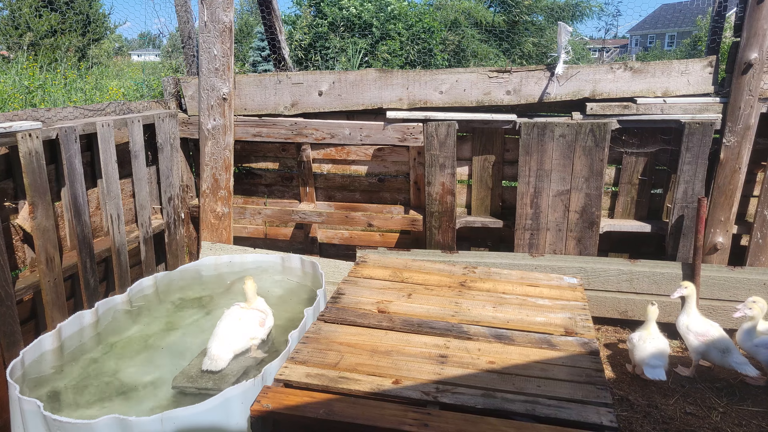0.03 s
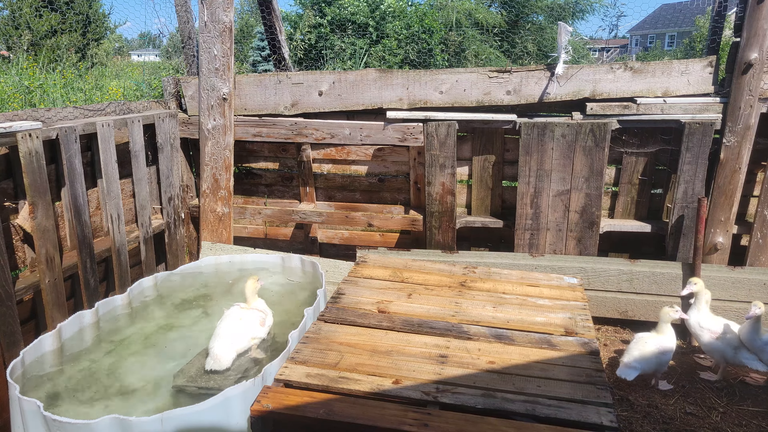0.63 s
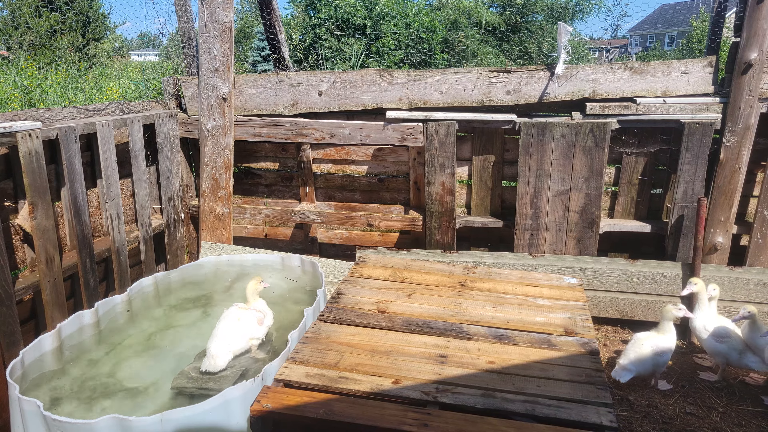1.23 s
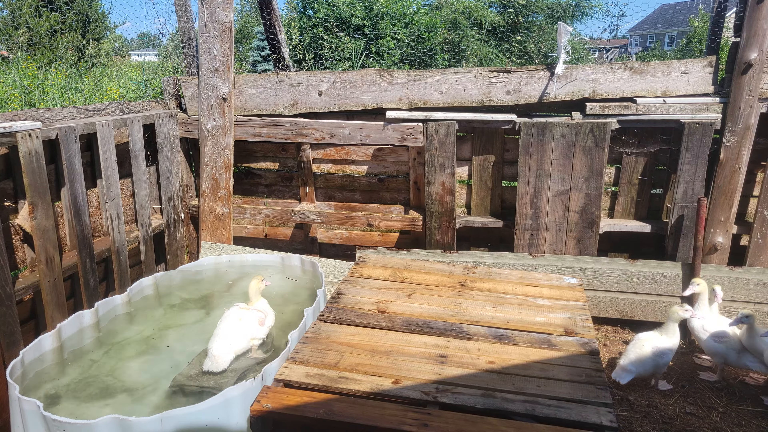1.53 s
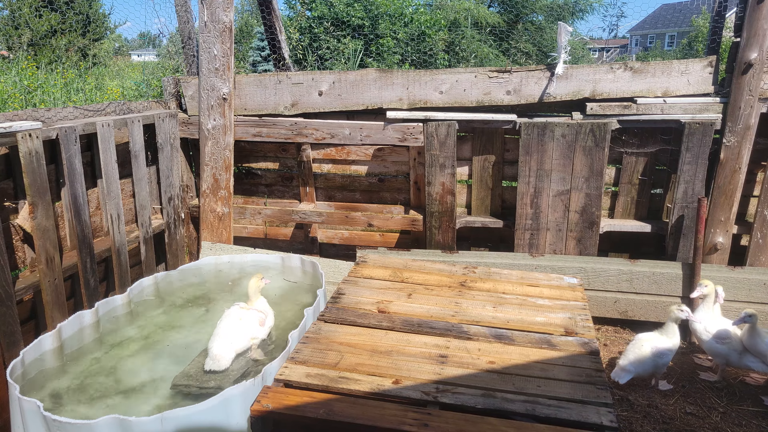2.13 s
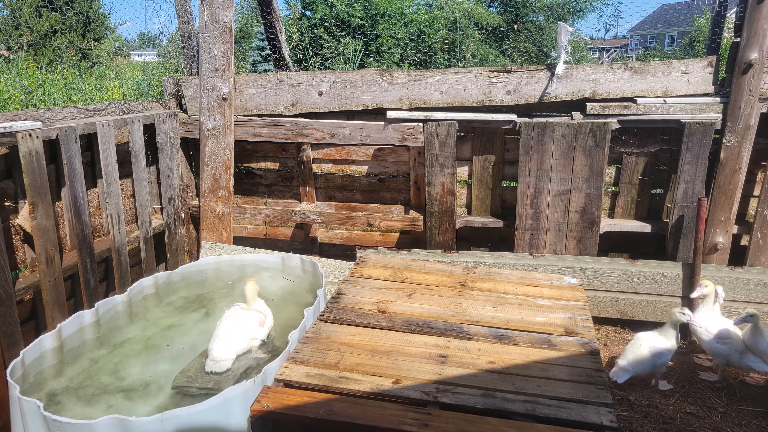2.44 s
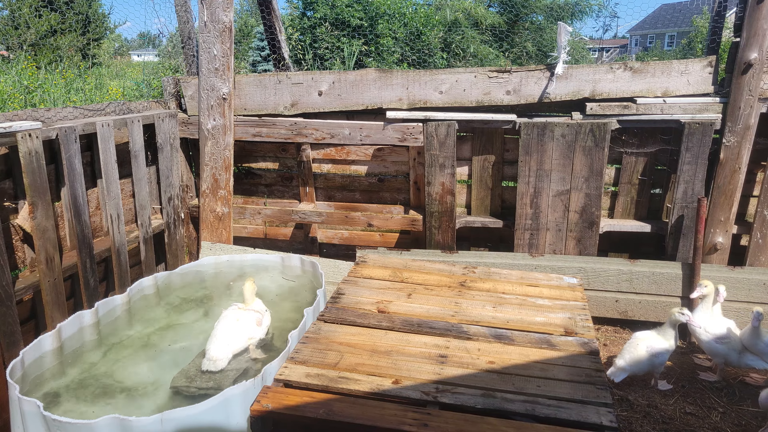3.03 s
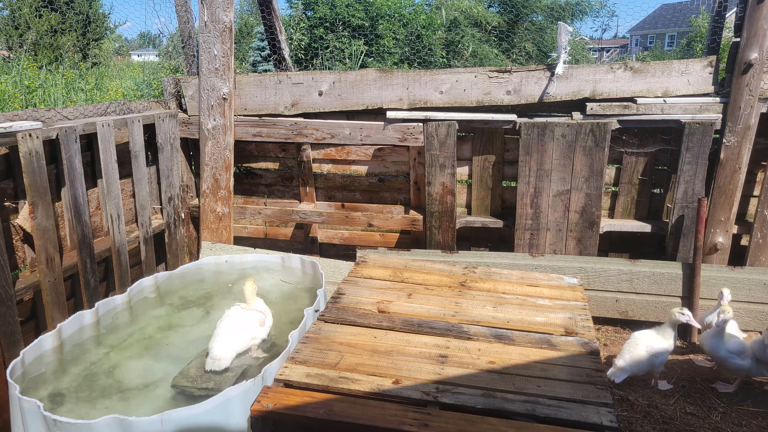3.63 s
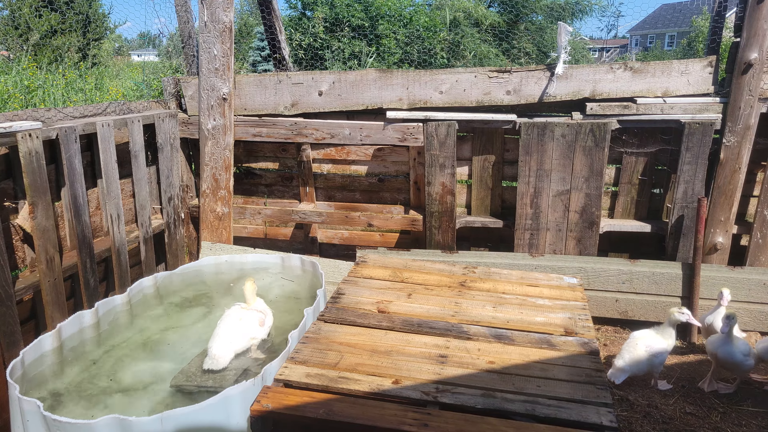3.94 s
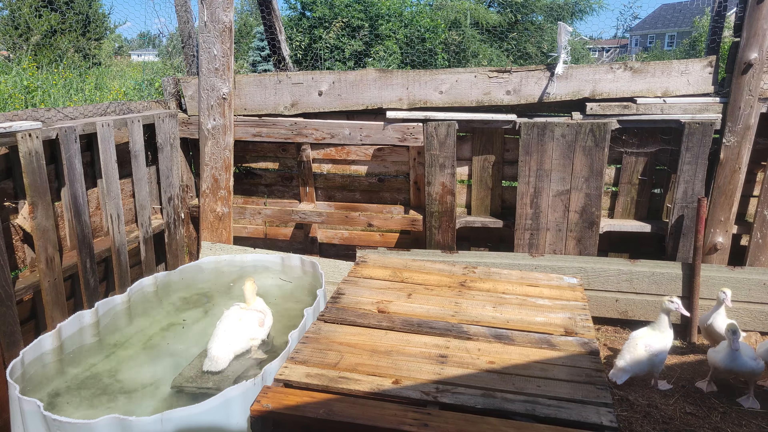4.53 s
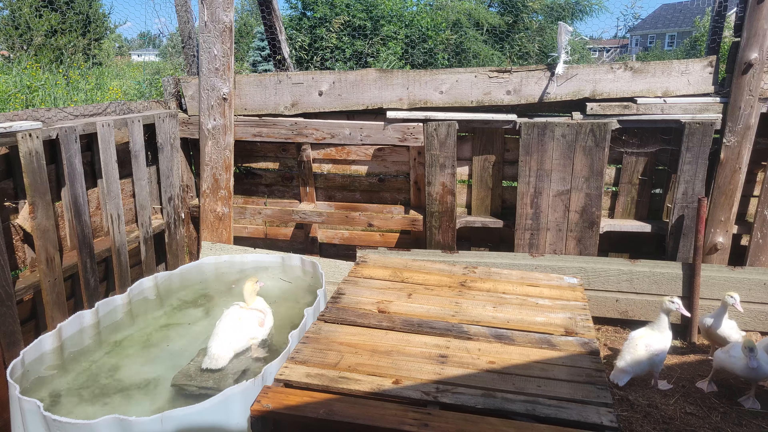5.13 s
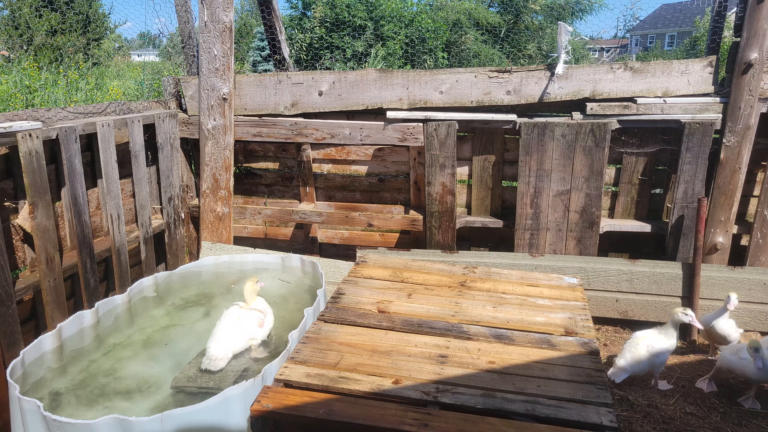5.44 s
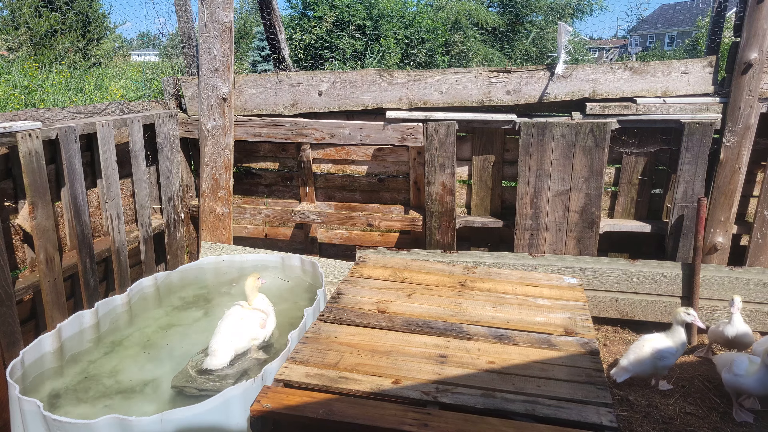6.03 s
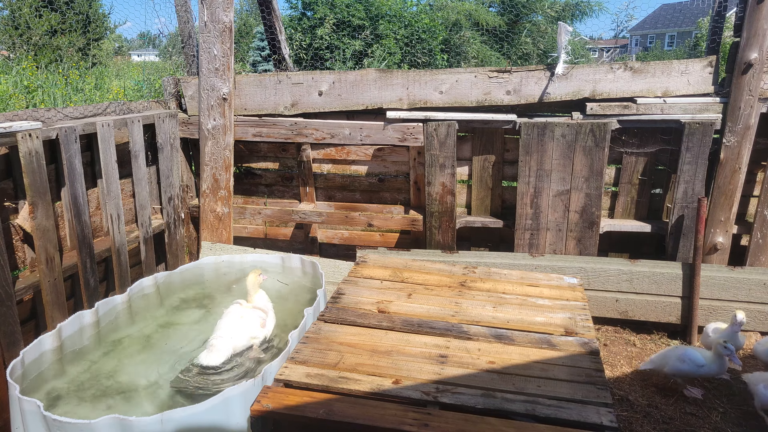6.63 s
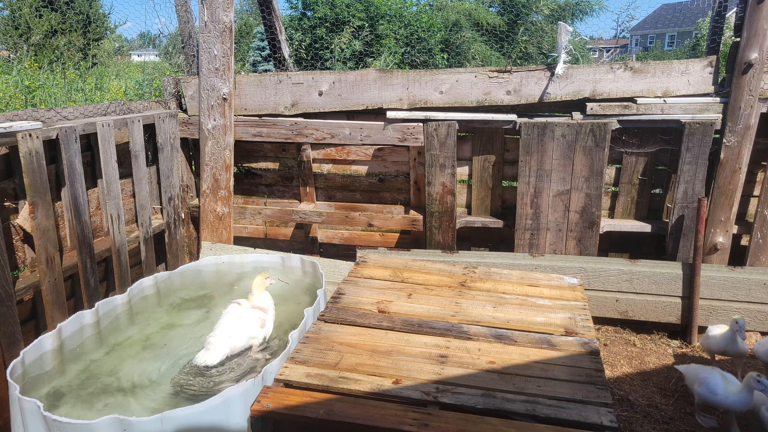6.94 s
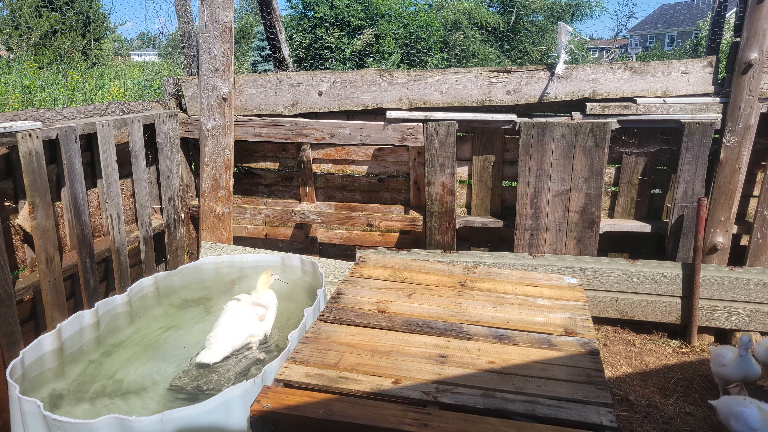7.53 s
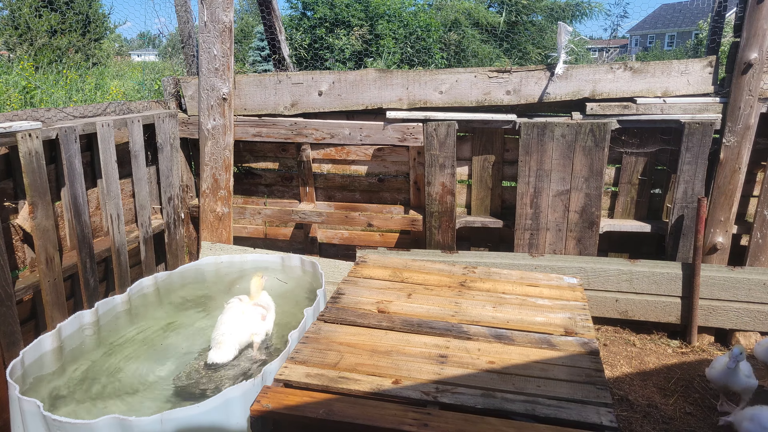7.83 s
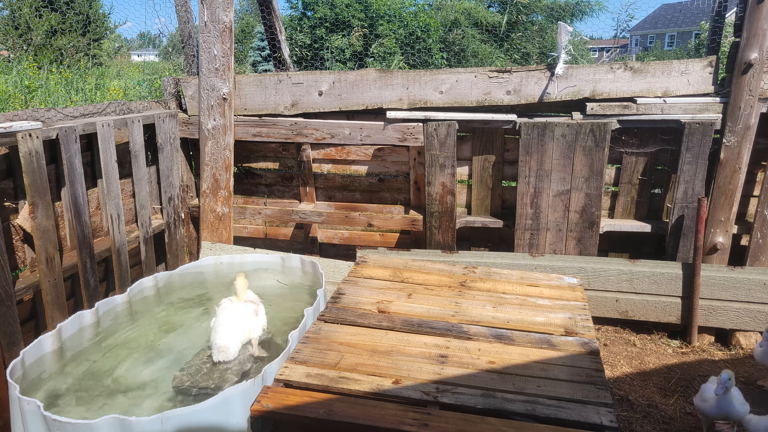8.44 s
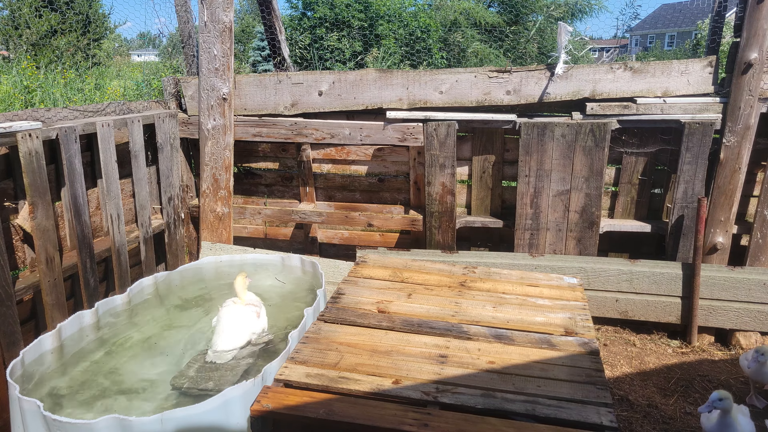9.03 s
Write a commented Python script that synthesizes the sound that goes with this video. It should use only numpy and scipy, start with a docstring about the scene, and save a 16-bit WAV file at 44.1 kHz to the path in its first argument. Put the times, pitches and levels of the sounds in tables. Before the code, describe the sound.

A quiet backyard pen, with soft steady outdoor air and a breeze rumbling on the microphone in short gusts throughout. From the start, ducklings slightly to the right slap, scuff and thump their wet feet and wings on wooden boards and soil, over a faint rustle of feathers and tiny gritty ticks. The loudest slap and knock comes at about 2 seconds, followed by a busy patter until 3 and scattered hits around 4 to 5, fading by 6. Thin, husky peeps and chirps begin near 0.7 seconds, are strongest from 1 to 2.5, then continue faintly, with warbling trills near 6.8 and 8.8. From about 6 seconds a duck paddles softly in a tub on the left, and from 7 to 9 it flicks small drops that plink into the water. The fence gives everything a short echo.

```python
"""Ducklings in a backyard pen

Off to the right, wet feet and wings slap, scuff and thump on wooden pallets and soil while the
ducklings peep in thin, husky whistles. Later the duck in the tub on the left paddles and flicks a few
drops, each leaving a tiny ringing bubble. The fence throws back a short echo, and a breeze rumbles on
the microphone's two openings (its ports) over a quiet garden."""
import sys
import numpy as np
from scipy import signal
from scipy.fft import rfft, irfft
from scipy.io import wavfile
from scipy.ndimage import uniform_filter1d

SR = 44100
rng = np.random.default_rng(int(sys.argv[2]) if len(sys.argv) > 2 else 0)


def master_out(mix):
    """Clip the mix to full scale and print it as 16-bit PCM to the path in sys.argv[1]."""
    frames = np.transpose(np.atleast_2d(mix))
    ceiling = np.clip(frames, -1, 1)
    pcm = np.round(ceiling * 32767).astype(np.int16)
    wavfile.write(sys.argv[1], SR, pcm)


N = 409688
TIME = np.arange(N) / SR
FREQS = np.fft.rfftfreq(N, 1 / SR)
SIDES = np.array([[1], [-1]])  # plus for the left channel, minus for the right
BRUSH_LEAD_S = .02  # a slap's sound starts this long before the hit

# How the two ports colour sound from all around differently: f/Hz, left minus right/dB
PORT_BALANCE = [(130, -5.5), (400, -2), (2400, -1.5), (4500, -7.5), (8500, 4.5), (11000, 10), (15500, 5)]


def slap(length, db, spray_db, hollow_db=2, brush_db=-21, fizz_db=-7.5):
    """A foot brushes the ground, then squeezes out a crackle of water and grit."""
    # Notes of the hollow under a webbed foot: f/Hz, width/Hz, level/dB
    hollow = [(1846, 68, 1), (2190, 23, -35), (2334, 86, -15), (2600, 69, -32), (3294, 220, 7),
              (3800, 96, 1)]
    t = np.arange(SR // 5) / SR - BRUSH_LEAD_S
    since_hit = np.maximum(t, 0)
    brush = undb(brush_db) * np.exp(-abs(t) / 0.0031)
    shape = swell_and_fade(since_hit, 0.21 * length, 0.34 * length) + brush
    crackle = grains(len(t), rate=11000, spread_db=2) * shape
    cupped = sum(undb(level + hollow_db) * ring(crackle, hz, width) for hz, width, level in hollow)
    smack = band(crackle + cupped, 640, 3020, order=3)
    spray = band(crackle, 3660, 6930, order=4)
    fine = crackle * np.exp(-since_hit / (5.9 * length))  # the finest spray is over first
    fizz = band(fine, 8600, 24000, order=3) + 0.27 * band(fine, 4300, 11900)
    return (burst(smack, length, db) + burst(spray, length, db + spray_db)
            + burst(fizz, length, db + spray_db + fizz_db))


def slaps(spatter_delay_s=0.025, spatter_length_s=0.035, spatter_db=-21):
    """Each wet slap is followed by a weaker spatter as the water lands again."""
    # Slaps and scuffs: t/s, length/s, level/dB, spray compared with that level/dB
    hits = [(.176, 0.013, -57.5, -1), (0.299, 0.033, -66.5, 5.5), (0.685, 0.0094, -50.5, -7),
            (0.764, 0.012, -53, -4.5), (1.448, 0.011, -36.5, 1.5), (1.701, 0.0094, -38.5, -2),
            (2.016, .008, -45, -12), (2.046, 0.0047, -24, -5), (2.074, 0.019, -47, 1.5),
            (2.241, 0.016, -49.5, -5), (2.345, 0.043, -58, 2), (2.465, 0.009, -39, -8.5),
            (2.568, 0.0096, -38, -2), (2.617, 0.022, -33.5, -1.5), (2.646, .012, -46.5, 9),
            (2.715, 0.013, -47.5, 3), (2.822, 0.019, -53, -3), (2.889, 0.014, -45, 7.5),
            (2.948, 0.041, -55, -4), (3.006, 0.013, -45, -1), (3.157, 0.01, -40.5, 1.5),
            (3.46, 0.027, -58, -11), (3.617, 0.011, -41, -1), (4.007, 0.006, -45, 5),
            (4.012, 0.0089, -29.5, -10), (4.192, 0.0091, -38, -11.5), (4.834, 0.012, -39.5, 0),
            (4.935, 0.0051, -44, -20), (5.579, 0.012, -55, 2.5), (5.663, 0.033, -54, -5.5),
            (5.791, 0.017, -64, 1), (6.09, .017, -67.5, 7), (6.599, 0.015, -63.5, 2),
            (8.608, 0.0085, -67, 8.5), (8.648, .06, -75, 7)]
    out = np.zeros(N)
    for s, length, db, spray_db in hits:
        start = s - BRUSH_LEAD_S
        add(out, start, slap(length, db, spray_db))
        add(out, start + spatter_delay_s, slap(spatter_length_s, db + spatter_db, spray_db))
    return out


def thumps(max_sag=0.68, soft_db=26, thud_db=-6):
    """A landing makes a short low note, and its rough push sets the boards ringing."""
    # Landings, several in a row for a heavy one: t/s, length/s, f/Hz, thump/dB, board knock/dB
    landings = [(.03, 0.025, 142, -46.5, -57), (0.419, 0.034, 145, -47, -64),
                (0.727, 0.0066, 300, -44.5, -51), (1.196, 0.0086, 280, -44.5, -51),
                (1.206, 0.043, 230, -42, -74), (1.313, 0.013, 245, -39.5, -53.5),
                (1.33, 0.039, 242, -40.5, -69), (1.453, 0.023, 308, -30.5, -40.5),
                (1.511, 0.022, 297, -43, -51.5), (1.704, 0.017, 158, -45.5, -43),
                (1.726, 0.031, 322, -48.5, -43), (1.935, 0.033, 201, -53, -47.5),
                (2.04, 0.01, 376, -27, -25), (2.046, 0.016, 561, -26.5, -29.5),
                (2.048, 0.014, 692, -22, -36), (2.055, 0.01, 364, -26.5, -38), (2.065, 0.02, 414, -43, -41),
                (2.238, 0.012, 280, -42.5, -44), (2.256, 0.031, 224, -39, -64),
                (2.468, 0.026, 206, -44, -43.5), (2.565, .036, 260, -45, -36.5),
                (2.612, 0.031, 238, -44, -31.5), (2.627, 0.023, 337, -35.5, -39),
                (2.741, 0.027, 230, -47, -47), (2.777, 0.016, 323, -27, -40.5),
                (2.79, 0.048, 168, -43.5, -58), (2.883, 0.036, 365, -55, -37.5),
                (2.947, 0.05, 396, -54, -46.5), (3.062, 0.03, 377, -69, -47.5),
                (3.148, 0.022, 265, -44, -40), (3.155, 0.05, 156, -47, -55), (3.45, 0.02, 497, -49.5, -48),
                (3.617, 0.049, 214, -56.5, -52.5), (4.019, 0.014, 321, -33, -35),
                (4.195, 0.037, 385, -53.5, -50), (4.26, 0.077, 283, -47.5, -52),
                (4.303, 0.011, 288, -32, -46.5), (4.5, 0.017, 129, -55, -82), (4.595, 0.029, 148, -68, -69),
                (4.797, 0.0057, 263, -32, -45.5), (4.804, 0.018, 442, -40.5, -53),
                (4.84, 0.021, 260, -48, -44), (4.937, 0.014, 320, -38.5, -35),
                (5.586, 0.0062, 272, -42, -51), (5.666, .021, 303, -60, -55.5),
                (5.794, 0.011, 269, -52.5, -56)]
    # Notes the boards ring with: f/Hz, width/Hz, level/dB
    boards = [(502, 240, 3), (549, 17, -0.5), (701, 70, 3), (872, 113, 2.5), (940, 1300, -7)]
    out, t = np.zeros(N), np.arange(SR // 5) / SR
    for s, length, hz, thump_db, knock_db in landings:
        softness = np.clip((thump_db - knock_db) / soft_db, 0, 1)  # soft landings sag more in pitch
        pitch = hz * (1 - max_sag * softness ** 2 * np.tanh(t / (2.96 * length)))
        shape = swell_and_fade(t, 0.14 * length, 0.57 * length)
        note = np.sin(2 * np.pi * np.cumsum(pitch) / SR) * shape
        thud = band(rng.standard_normal(len(t)) * shape, 120, 325)
        thump = unit(note) + undb(thud_db) * unit(thud)
        push = rng.standard_normal(len(t)) * swell_and_fade(t, 0.11 * length, 0.59 * length)
        knock = sum(undb(db) * ring(push, f, width) for f, width, db in boards)
        add(out, s, burst(thump, length, thump_db) + burst(band(knock, 350, 1860), length, knock_db))
    return out


def voice(hz, hoarse):
    """A whistle with weak overtones; a hoarse throat shakes its pitch and strength and adds hiss."""
    hoarse = np.clip(hoarse, 0, 1)
    shake = (.012 + .11 * hoarse ** 3) * wander(900, len(hz))
    flutter = (.15 + .8 * hoarse) * wander(600, len(hz))
    phase = 2 * np.pi * np.cumsum(hz * (1 + shake)) / SR
    tone = np.sin(phase) + undb(-14) * np.sin(2 * phase) + undb(-25) * np.sin(3 * phase)
    hiss = band(rng.standard_normal(len(hz)), .75 * np.mean(hz), 2.2 * np.mean(hz), order=3)
    return unit(unit(tone * (1 + flutter)) + hoarse * undb(-4) * unit(hiss))


def call(length, hz, rise_oct, arch_oct, db, hoarse, warble_oct=0, warble_hz=21, fade=0.16):
    """One call: the pitch glides along an arch, perhaps warbling, while the voice fades a little."""
    progress = np.linspace(0, 1, int(length * SR))
    glide = rise_oct * (progress - .5) - arch_oct * (2 * progress - 1) ** 2
    warble = warble_oct * progress * np.sin(2 * np.pi * warble_hz * length * progress)
    shape = signal.windows.tukey(len(progress), .25) * np.exp(-fade * progress)
    return burst(voice(hz * 2 ** (glide - warble), hoarse) * shape, length, db)


def ducklings(peep_fall_oct=0.35, peep_arch_oct=0.057, peep_hoarse=.33, faint_from_s=6.8):
    """Falling peeps, arched chirps and two trills, with four faint peeps from the rest of the flock."""
    # Short falling peeps: t/s, length/s, f/Hz, level/dB
    peeps = [(1.557, 0.063, 1890, -42), (2.318, 0.025, 1640, -43.5), (2.435, 0.03, 1718, -38.5),
             (3.471, 0.058, 1980, -65), (3.577, .037, 2610, -59), (4.407, 0.03, 2520, -67),
             (4.518, 0.028, 2980, -84), (4.594, 0.067, 2610, -64), (4.71, 0.05, 2620, -64.5),
             (5.053, 0.031, 2220, -61), (5.408, 0.046, 2870, -64.5), (5.696, 0.03, 2400, -64),
             (5.842, 0.037, 2450, -67), (6.157, .045, 2530, -67), (6.211, 0.039, 2060, -64),
             (6.292, .065, 2250, -64), (6.469, 0.032, 2100, -64.5), (6.702, 0.041, 2300, -63.5),
             (7.048, 0.05, 2480, -68), (7.389, 0.029, 2210, -64.5), (7.597, 0.095, 2310, -71),
             (7.757, 0.067, 2780, -62.5), (7.84, 0.078, 2100, -64), (8.07, .06, 2930, -73),
             (8.374, 0.029, 3060, -71)]
    # Chirps: t/s, length/s, middle f/Hz, rise/octaves, level/dB, hoarseness (0 clear, 1 rasping)
    chirps = [(0.706, 0.07, 2320, 0.42, -53, .35), (0.892, 0.25, 2210, -0.042, -64, .95),
              (1.005, 0.023, 1400, -.1, -47, 0.77), (1.251, 0.046, 1887, -0.023, -45.5, 0.13),
              (1.349, 0.019, 1706, -0.11, -42.5, 0.14), (1.629, 0.07, 2064, -0.2, -43, 0.88),
              (1.635, 0.057, 2780, -.07, -51.5, 0.4), (1.782, 0.056, 2418, -0.19, -48, 0.57),
              (1.933, .03, 2386, 0.053, -45, 1.13), (3.301, .084, 1830, .33, -55.5, 0.16),
              (6.754, 0.059, 1764, -0.15, -64.5, 0.21), (8.486, 0.049, 1860, -.07, -59, 0.3),
              (8.667, 0.045, 2450, -0.11, -57.5, 0.35), (8.8, .035, 1620, 0.17, -61.5, 0.59),
              (9.075, 0.1, 2690, -0.63, -65, 0.26), (9.101, 0.092, 1660, 0.044, -59.5, 0.4)]
    # Husky trills that climb as they warble: t/s, length/s, middle f/Hz, rise/octaves, level/dB
    trills = [(6.767, .198, 2185, 0.093, -60.5), (8.819, .245, 1978, 0.39, -58.5)]
    out = np.zeros(N)
    for s, length, hz, db in peeps:
        hoarse = peep_hoarse + .005 * (db + 63)  # more effort makes a hoarser peep
        add(out, s, call(length, hz, -peep_fall_oct, peep_arch_oct, db, hoarse))
    for s, length, hz, rise_oct, db, hoarse in chirps:
        add(out, s, call(length, hz, rise_oct, arch_oct=.21, db=db, hoarse=hoarse))
    for s, length, hz, rise_oct, db in trills:
        trill = call(length, hz, rise_oct, arch_oct=0, db=db, hoarse=.54, warble_oct=.26, fade=0.099)
        add(out, s, trill)
    for when, pitch in rng.random((4, 2)):
        hz = 2850 * 2 ** (.4 * (pitch - .5))
        faint_peep = call(0.023, hz, -peep_fall_oct, peep_arch_oct, db=-68, hoarse=peep_hoarse)
        add(out, faint_from_s + when * (TIME[-1] - faint_from_s), faint_peep)
    return out


def drop(hz, db, glide_per_s=8):
    """A drop ticks on the water and leaves a tiny bubble that rises in pitch."""
    t = np.arange(SR // 20) / SR
    bubble = np.sin(2 * np.pi * hz * t * (1 + glide_per_s * t / 2)) * swell_and_fade(t, 0.0013, 0.0036)
    crackle = grains(len(t), rate=6000, spread_db=1.4) * swell_and_fade(t, 0.0012, 0.0033)
    splash = band(crackle, 2700, 6300, order=4)
    return burst(unit(bubble) + undb(1) * unit(splash), length=0.0052, db=db)


def drips(faint_db=-69, faint_from_s=4.6, faint_count=26):
    """The duck in the tub flicks up some clear drops and a sprinkle of faint ones."""
    # Drops falling back into the tub: t/s, f/Hz, level/dB
    clear_drops = [(7.138, 3620, -57), (7.178, 5270, -59.5), (7.276, 2970, -57.5), (7.319, 3370, -63),
                   (7.87, 2170, -59), (7.896, 5470, -48.5), (8.035, 4200, -53.5), (8.178, 5620, -48.5),
                   (8.228, 4020, -54.5), (8.232, 1500, -49), (8.314, 5600, -57), (8.609, 6000, -64.5),
                   (8.838, 3730, -49), (9.163, 3400, -58.5)]
    out = np.zeros(N)
    for s, hz, db in clear_drops:
        add(out, s, drop(hz, db))
    for when, pitch, size in rng.random((faint_count, 3)):
        s = faint_from_s + when * (TIME[-1] - faint_from_s)
        add(out, s, drop(1200 * 5 ** pitch, faint_db + 6 * size))
    return out


def paddling(patchy_db=2.0):
    """Ripples slosh and lap unevenly at the tub wall, with a fine fizz from wet feathers."""
    # How strongly the duck stirs the water: t/s, level/dB
    stirring = [(5.8, -85), (6.15, -74), (6.6, -70), (7.2, -80), (7.7, -95), (8.25, -63), (8.45, -81),
                (8.65, -66), (8.9, -72), (9.2, -67.5), (9.29, -88)]
    db, = curve(stirring)
    slosh = unit(band(grains(N, rate=500, spread_db=4.4), 230, 500))
    lapping = unit(band(grains(N, rate=900, spread_db=2.5), 540, 1700))
    fizz = unit(band(grains(N, rate=5000, spread_db=2), 12000, 17000))
    return (undb(-1) * slosh + lapping + undb(-10) * fizz) * undb(db + patchy_db * wander(25))


def shuffle(patchy_db=1.6):
    """Soft feathers and dry soil rustle faintly and unevenly."""
    # How much the feathers and feet move: t/s, level/dB
    movement = [(0, -68.5), (.32, -59.5), (.55, -68), (.8, -63.5), (1.35, -68.5), (1.55, -58),
                (1.85, -58.5), (2.1, -55.5), (2.3, -59.5), (3.02, -53), (3.25, -68.5), (3.62, -59.5),
                (3.8, -70), (5.6, -66.5), (6, -78.5), (9.29, -86)]
    db, = curve(movement)
    grit = grains(N, rate=7000, spread_db=3.1)
    rustle = unit(band(grit, 1220, 5580))
    fizz = unit(band(grit, 4500, 14300))
    low_scuff = unit(band(grit, 167, 710))
    return (rustle + undb(-10) * fizz + low_scuff) * undb(db + patchy_db * wander(45))


def ticks(softest_db=-71, range_db=8, count=70):
    """Small feet and bills tick softly on grit all the while."""
    out, t = np.zeros(N), np.arange(SR // 25) / SR
    for when, size, brightness in rng.random((count, 3)):
        grit = grains(len(t), rate=7000, spread_db=1.7) * swell_and_fade(t, 0.0033, 0.0022)
        tick = band(grit, 1200 + 4000 * brightness, 6000 + 10000 * brightness)
        add(out, when * TIME[-1], burst(tick, length=0.0078, db=softest_db + range_db * size))
    return out


def breeze(steady_db=2, gust_db=-2, eddy_db=2, stereo_width=0.23):
    """Gusts swell and die over a restless breeze, booming and rumbling nearly alike at both ports."""
    # Steady wind on the microphone: t/s, boom/dB, deep rumble/dB
    steady_wind = [(0.0, -83, -52), (0.18, -56.5, -67), (2.69, -52, -75), (3.96, -60.5, -76),
                   (5.28, -57.5, -70), (6.96, -56.5, -65), (7.14, -60, -52), (7.86, -62, -64),
                   (9.03, -60, -63), (9.29, -59, -49)]
    # Strong gusts: peak t/s, length/s, boom/dB, deep rumble/dB
    gusts = [(0.039, 0.033, -44, -61), (0.304, 0.064, -41, -45), (0.692, 0.065, -45.5, -53),
             (1.232, 0.036, -40.5, -60), (1.643, 0.2, -43, -51), (2.036, 0.051, -40.5, -58),
             (2.52, 0.14, -43.5, -68), (3.62, 0.041, -44.5, -62), (4.608, 0.028, -43, -66),
             (4.74, 0.058, -49.5, -51), (5.25, 0.12, -60, -41.5), (5.625, 0.13, -48, -51),
             (5.87, 0.087, -68, -47), (6.36, 0.035, -41, -57), (7.034, .12, -49.5, -50),
             (7.413, 0.037, -51, -50), (7.911, 0.037, -50.5, -48), (8.63, 0.1, -57, -47.5),
             (9.198, 0.051, -41.5, -38.5)]
    boom_hz, rumble_hz = (53.2, 104.7), (30.6, 62)
    power = undb(np.array(curve(steady_wind)) + steady_db + eddy_db * wander(14)) ** 2
    for s, length, *peak_db in gusts:
        swell = np.exp(-(2 * (TIME - s) / length) ** 2)
        power += undb(np.array(peak_db)[:, None] + gust_db) ** 2 * swell
    out = 0
    for strength, (lo_hz, hi_hz) in zip(np.sqrt(power), [boom_hz, rumble_hz]):
        shared, difference = band(rng.standard_normal((2, N)), lo_hz, hi_hz)
        even_swirls = shared / np.sqrt(uniform_filter1d(shared ** 2, SR // 10) + 1e-12)
        out = out + strength * (even_swirls + stereo_width * unit(difference) * SIDES)
    return out


def garden(db=-59.5, port_delay_s=0.00075):
    """Almost steady outdoor air from all around: the ports agree in the bass and differ higher up."""
    # Tone of the garden air: f/Hz, relative level/dB
    air_tone = [(76, -5), (130, -14.5), (250, -5.5), (400, -13), (510, -4), (780, -15), (1000, -10.5),
                (2000, -18.5), (5400, -26), (7200, -27), (8400, -36.5), (9400, -30.5), (11300, -35.5),
                (13500, -28.5), (16000, -31)]
    bass_cut = FREQS ** 2 / (FREQS ** 2 + 90 ** 2)
    noise = rfft(rng.standard_normal((2, N))) * undb(spectrum_db(air_tone)) * bass_cut
    alike = np.sinc(2 * FREQS * port_delay_s)
    air = irfft(stereo(noise, alike) * side_gains(PORT_BALANCE), N)
    return unit(air) * undb(db + .4 * wander(3))


def pen(x, lag_ms, echo_db, echo_s, balance):
    """Sound reaches the left port lag_ms after the right; ground and fence slats add short echoes."""
    t = np.arange(SR // 3) / SR
    decay_s = echo_s / np.log(1000)  # echoes fall by 60 dB in echo_s
    scatter = rng.standard_normal((2, len(t))) * swell_and_fade(t, 0.0013, decay_s)
    scatter /= np.sqrt(np.sum(scatter ** 2, axis=1, keepdims=True))
    alike = 1 / (1 + (FREQS / 550) ** 4)
    treble_cut = 1 / np.hypot(1, FREQS / 8000)
    echo = stereo(rfft(scatter, N), alike) / np.sqrt(2) * treble_cut
    direct = np.exp(-1j * np.pi * FREQS * SIDES * lag_ms / 1000)
    return irfft(rfft(x) * (direct + undb(echo_db) * echo) * side_gains(balance), N)


def undb(db):
    """Turn decibels into a number to multiply by."""
    return 10 ** (np.asarray(db) / 20)


def unit(x):
    """Scale to an average strength (rms) of 1."""
    return x / np.sqrt(np.mean(x ** 2) + 1e-20)


def band(x, lo_hz, hi_hz, order=2):
    """Keep the sound between two frequencies."""
    edges = [lo_hz, min(hi_hz, .45 * SR)]
    return signal.sosfilt(signal.butter(order, edges, "band", fs=SR, output="sos"), x)


def ring(x, hz, width):
    """Make x ring at one note; a narrower width rings longer."""
    return signal.lfilter(*signal.iirpeak(hz, hz / width, fs=SR), x)


def curve(rows):
    """Join rows that start with a time into one line per remaining column."""
    s, *columns = np.transpose(rows)
    return [np.interp(TIME, s, column) for column in columns]


def spectrum_db(points):
    """Join (f/Hz, level/dB) points into a level for every frequency."""
    hz, db = np.transpose(points)
    return np.interp(np.log(FREQS + 1), np.log(hz), db)


def side_gains(balance):
    """Share a left-minus-right level difference between the two channels."""
    return undb(SIDES * spectrum_db(balance) / 2)


def stereo(noises, alike):
    """Blend two noises into left and right: the same where alike is 1, unrelated where it is 0."""
    shared, difference = noises
    return shared * np.sqrt(1 + alike) + SIDES * difference * np.sqrt(1 - alike)


def wander(rate, size=N):
    """A smooth random drift of about 1 either way, with `rate` new values a second."""
    step = max(int(SR / rate), 1)
    stairs = np.repeat(rng.standard_normal(size // step + 1), step)
    return 1.3 * uniform_filter1d(uniform_filter1d(stairs, step), step)[:size]


def grains(size, rate, spread_db):
    """Tiny random clicks, about `rate` a second, a few much bigger than the rest."""
    present = rng.random(size) < rate / SR
    clicks = present * rng.standard_normal(size)
    return unit(clicks * undb(spread_db * np.minimum(rng.exponential(size=size), 4)))


def swell_and_fade(t, rise_s, decay_s):
    """A loudness shape that swells quickly, then dies away."""
    return (1 - np.exp(-(t / rise_s) ** 2)) * np.exp(-t / decay_s)


def burst(x, length, db):
    """Give a short sound the energy of `length` seconds at level db."""
    return x * undb(db) * np.sqrt(length * SR / (np.sum(x ** 2) + 1e-20))


def add(track, s, x):
    """Mix x into the track, starting at s seconds."""
    i = max(int(s * SR), 0)
    track[i:i + len(x)] += x[:N - i]


def scene():
    """The flock is off to the right, the tub to the left."""
    # The right port faces the ducklings: f/Hz, left minus right/dB
    flock_side = [(100, 0.5), (200, -3.5), (700, -2.5), (2400, -4), (4500, -4.5), (6500, -9.5), (8500, 14),
                  (12000, 3.5), (15500, -3)]
    wet = undb(-1.23) * pen(slaps(), lag_ms=0.3997, echo_db=-1, echo_s=.1, balance=flock_side)
    weight = undb(1) * pen(thumps(), lag_ms=0.38, echo_db=-13, echo_s=0.25, balance=flock_side)
    fidgets = shuffle() + ticks()
    rustle = undb(-2) * pen(fidgets, lag_ms=0.408, echo_db=3, echo_s=0.059, balance=flock_side)
    calls = undb(-1) * pen(ducklings(), lag_ms=0.43, echo_db=-2.5, echo_s=0.16, balance=flock_side)
    tub = pen(drips() + paddling(), lag_ms=-0.416, echo_db=0.5, echo_s=0.079, balance=PORT_BALANCE)
    return wet + weight + rustle + calls + tub + breeze() + garden()


def record(dry):
    """The recorder cuts the treble above 16000 Hz."""
    return signal.sosfilt(signal.ellip(10, .2, 70, 16000, fs=SR, output="sos"), dry)


dry = scene()
out = record(dry)
master_out(out)
```